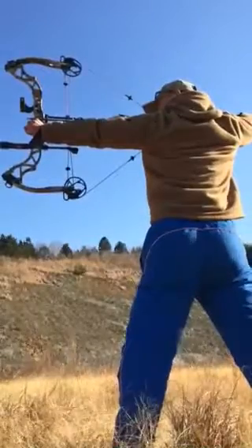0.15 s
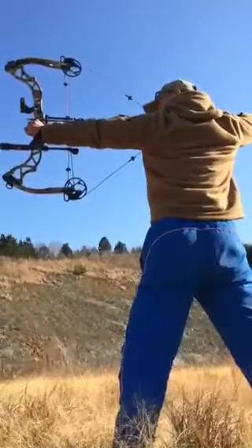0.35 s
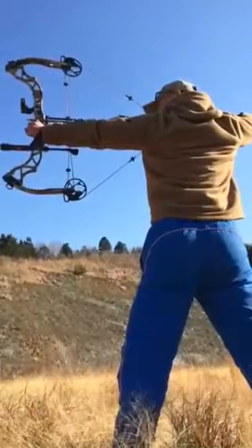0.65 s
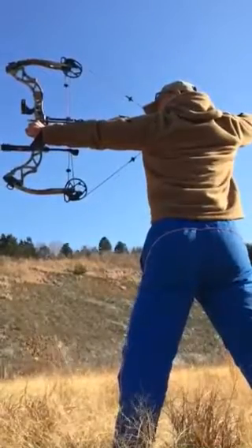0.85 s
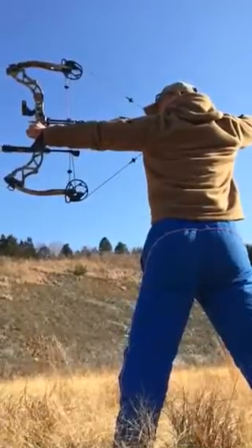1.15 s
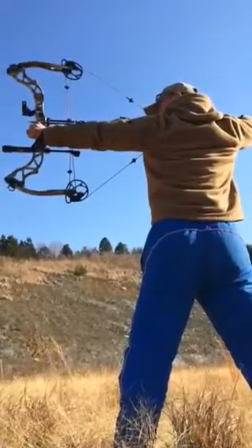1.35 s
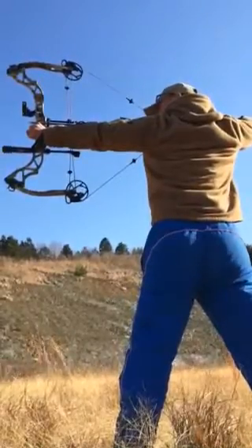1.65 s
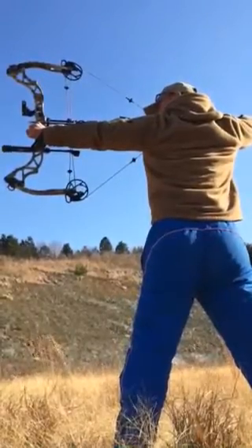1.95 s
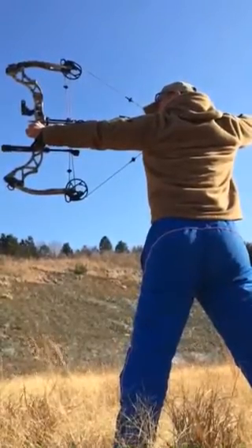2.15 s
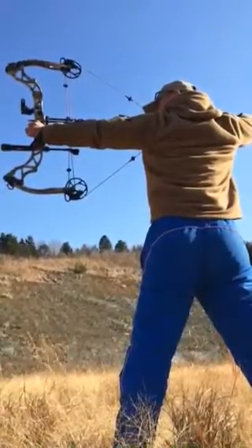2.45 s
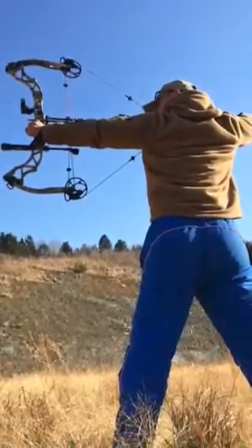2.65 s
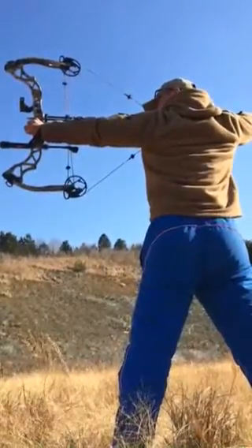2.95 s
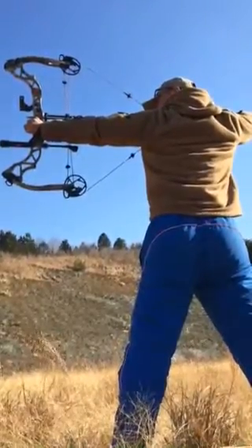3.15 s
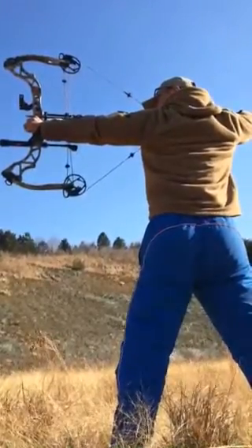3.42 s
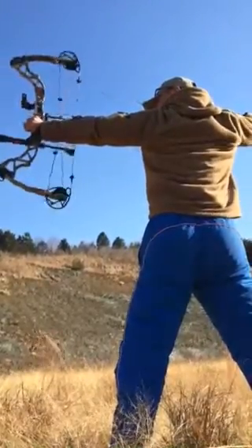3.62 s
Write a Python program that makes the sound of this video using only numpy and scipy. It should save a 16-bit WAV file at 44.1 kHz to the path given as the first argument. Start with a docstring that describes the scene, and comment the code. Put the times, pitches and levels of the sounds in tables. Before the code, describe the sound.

The sharp snap of a compound bow comes after a few quiet seconds of faint wind and rustling grass, with small low gusts on the microphone. The shot is close, with a brief rattle and no echo in the open field.

```python
"""A light breeze hisses in dry grass, and its eddies now and then buffet the microphone.
Near the end a compound bow is shot close by: the string rushes forward, slams home and rebounds.
Each impact excites the damped modes of limbs, riser and string; the string thunks with a sagging
pitch, and the fittings clack and buzz briefly. The open field returns no echo."""
import sys
import numpy as np
from scipy import signal
from scipy.fft import rfft, irfft
from scipy.io import wavfile
from scipy.ndimage import uniform_filter1d

SR = 44100
rng = np.random.default_rng(int(sys.argv[2]) if len(sys.argv) > 2 else 0)


def to_wav(s):
    """Save 16-bit WAV."""
    ch = np.atleast_2d(s).T  # columns
    pcm = np.round(np.clip(ch, -1, 1) * 32767)  # PCM
    wavfile.write(sys.argv[1], SR, pcm.astype(np.int16))


N = 166698

# Course of the field's hiss and of the stalks' rustle: t/s, level/dB
BREEZE_LEVEL = [(0, -51), (.6, -51.5), (1.15, -52), (2.4, -53), (3.4, -53), (3.78, -51)]
STALK_LEVEL = [(0, -60), (.5, -61.5), (1.0, -60), (1.4, -63), (2.0, -63.5), (2.6, -66.5), (3.3, -64.5),
               (3.78, -63.5)]
# Spectra of hiss, rustle, wind rumble and turbulence within an eddy: f/Hz, relative density/dB
HISS_SPECTRUM = [(100, -3.5), (400, -3), (600, -4), (850, 0.5), (1150, 0.5), (1800, -2), (2600, -8.5),
                 (4000, -16), (7000, -21.5), (15000, -24)]
STALK_SPECTRUM = [(300, -4), (1500, -3), (3000, 6), (5000, 0.5), (8000, -1.5), (12000, -3), (15000, -2.5)]
RUMBLE_SPECTRUM = [(20, -41), (40, -3), (65, -0.5), (110, -1), (170, 0), (230, -8.5), (300, -11.5),
                   (500, -24), (1000, -42.5)]
EDDY_SPECTRUM = [(60, -5), (170, 2), (280, -5), (420, -14), (700, -29), (1500, -50)]
# Eddies striking the microphone: t/s, f/Hz, envelope peak/dB, half-width/cycles
EDDIES = [(0.691, 127, -37, 0.53), (1.048, 101, -32, 0.26), (1.109, 113, -33.5, 0.98),
          (1.308, 65.4, -25, 0.17), (1.325, 70, -25.5, 0.16), (1.368, 100, -31.5, 0.31),
          (1.409, 124, -35, .7), (1.443, 228, -23.5, 0.32), (1.463, 80, -37.5, 0.78),
          (1.546, 80.4, -24, 0.17), (1.578, 95, -37, 0.35), (2.002, 84, -37, 0.45),
          (2.435, 100, -35.5, 0.26), (2.772, 85, -31, 0.23), (2.943, 98, -24, 0.33), (2.956, 139, -38, .6),
          (3.156, 74, -35, 0.36), (3.189, 68.5, -27.5, 0.28), (3.288, 70, -34, 0.35),
          (3.319, 87.5, -31, 0.6), (3.555, 90, -30.5, 0.27)]
# The string's impact and rebounds: t/s, tick/dB, crack/dB, ring/dB, crack attack/s, crack T60/s
IMPACTS = [(3.5703, -24, -14, 1, 0.0013, 0.023), (3.5809, -22, -25.5, -23, 0.0008, 0.057),
           (3.592, -11.5, -21.5, -22.5, 0.00058, 0.031), (3.6086, -42, -35, -17, .001, 0.041)]
# Spectra of the hard contacts and of the buzzing fittings: f/Hz, relative density/dB
CONTACT_SPECTRUM = [(120, -24), (300, -13), (600, -1), (780, 3), (1100, -17), (1380, 6), (2200, -2.5),
                    (2600, -9), (2900, 7.5), (3900, -4.5), (5200, -2), (7200, -1), (8400, -18), (9500, 0.5),
                    (11000, -19), (13000, -13), (15000, -4.5)]
BUZZ_SPECTRUM = [(150, -10), (300, 2), (420, 9), (600, -6), (780, 9), (940, 7), (1100, -9), (1400, -2),
                 (2350, -9), (2950, 6), (3900, -2.5), (5200, -9), (7200, -8), (8400, -9), (9600, -8),
                 (11500, -7.5), (15000, -13)]
# Normal modes of limbs, riser and string: f/Hz, level/dB, T60/s
MODES = [(233, -22, 0.048), (380, -25, 0.17), (500, -23, 0.085), (667, -22.5, 0.071), (768, -33, 0.19),
         (831, -22.5, 0.087), (941, -31, 0.12), (1430, -23.5, 0.069), (1517, -28, .09), (1851, -26, 0.089),
         (2352, -33.5, 0.091), (2740, -27.5, 0.05), (2970, -27, 0.062), (3160, -27.5, .08),
         (4415, -29, .08)]

SHOT_S = IMPACTS[0][0]
RING_LAG_S, RING_ATTACK_S = 0.001413, 0.0011


def undb(db):
    """Amplitude ratio of a level in dB."""
    return 10 ** (np.asarray(db) / 20)


def noise(spectrum):
    """White noise filtered to a spectrum (f/Hz, density/dB), at unit rms."""
    hz, db = np.array(spectrum, float).T
    bin_hz = np.maximum(np.arange(N // 2 + 1) * SR / N, 1)
    gain = undb(np.interp(np.log(bin_hz), np.log(hz), db))
    shaped = irfft(rfft(rng.standard_normal(N)) * gain, N)
    return shaped / np.std(shaped)


def flutter(rate_hz):
    """Random values joined by linear ramps, with unit standard deviation."""
    step = max(int(SR / rate_hz), 1)
    held = np.repeat(rng.standard_normal(N)[:N // step + 1], step)
    ramped = uniform_filter1d(held, step)[:N]
    return ramped / np.std(ramped)


def strike(age, attack, t60, hold=0):
    """Linear rise, hold, then exponential decay by 60 dB in t60; times in s."""
    return np.clip(age / attack, 0, 1) * np.exp(-np.log(1000) * np.maximum(age - hold, 0) / t60)


def grass(t, breeze_db):
    """Turbulent flow over the field and friction between dry stalks radiate broadband noise."""
    hiss = undb(breeze_db + .5 * flutter(9)) * noise(HISS_SPECTRUM)
    stalk_db = np.interp(t, *np.array(STALK_LEVEL).T)
    rustle = undb(stalk_db + .4 * flutter(12)) * noise(STALK_SPECTRUM)
    return hiss + rustle


def microphone_wind(t, breeze_db):
    """Turbulent pressure: a rumble follows the breeze, and each eddy pushes and pulls the diaphragm."""
    rumble_db = -50.5 + 0.91 * (breeze_db - breeze_db.mean()) + 2 * flutter(25.03)
    pressure = undb(rumble_db) * noise(RUMBLE_SPECTRUM)
    turbulence = undb(-18) * noise(EDDY_SPECTRUM)
    for when, hz, db, width in EDDIES:
        near = np.abs(t - when) * hz < 10
        cycles = (t[near] - when) * hz
        pulse = np.sin(2 * np.pi * cycles) / np.cosh(cycles / width)
        ragged = turbulence[near] / np.cosh(cycles / (2 * width))
        pressure[near] += undb(db) * (pulse + ragged)
    return pressure


def bow_snap(t):
    """Brief contacts have broad spectra: each impact ticks and cracks, and loose fittings buzz."""
    age = t - SHOT_S
    # String and arrow rush forward just ahead of the first impact.
    rush = undb(-26) * strike(age + 0.0055, attack=.003, t60=0.042)
    ticks = sum(undb(db) * strike(t - start, attack=0.00015, t60=0.0069) for start, db, *_ in IMPACTS)
    cracks = sum(undb(db) * strike(t - start, attack, t60) for start, _, db, _, attack, t60 in IMPACTS)
    buzz = undb(-25 + 0.5 * flutter(700)) * strike(age, RING_ATTACK_S, t60=0.1, hold=0.021)
    return (rush * rng.standard_normal(N)
            + (ticks + cracks) * noise(CONTACT_SPECTRUM)
            + buzz * noise(BUZZ_SPECTRUM))


def bow_ring(t, hum_hz=401):
    """Superposition of damped modes, excited at each impact; the lightly damped string hums on."""
    ring = np.zeros(N)
    for start, _, _, ring_db, *_ in IMPACTS:
        on = t > start + RING_LAG_S
        age = t[on] - start - RING_LAG_S
        for hz, db, t60 in MODES:
            ring[on] += undb(ring_db + db) * strike(age, RING_ATTACK_S, t60) * np.sin(2 * np.pi * hz * age)
    age = t - SHOT_S
    hum = undb(-38.5) * strike(age, RING_ATTACK_S, t60=0.42) * np.sin(2 * np.pi * hum_hz * age)
    return hum - ring


def string_thunk(t, rest_hz=393.4, sag_hz=50.7, sag_s=0.017):
    """Nonlinear free vibration: the arrested string's pitch sags as the shock dies away."""
    age = np.maximum(t - SHOT_S - RING_LAG_S, 0)
    cycles = rest_hz * age + sag_hz * sag_s * (1 - np.exp(-age / sag_s))
    envelope = undb(-15.5) * strike(age, RING_ATTACK_S, t60=0.11, hold=0.0052)
    return -envelope * np.sin(2 * np.pi * cycles)


def scene():
    """In a free field the pressures of wind and bow add without reflections."""
    t = np.arange(N) / SR
    breeze_db = np.interp(t, *np.array(BREEZE_LEVEL).T)
    bow = string_thunk(t) + bow_ring(t) + bow_snap(t)
    return (bow + microphone_wind(t, breeze_db) + grass(t, breeze_db))[None]


def record(dry):
    """Band limiting: filters remove the deepest rumble and the highest treble."""
    highpass = signal.butter(2, 28, "high", fs=SR, output="sos")
    lowpass = signal.ellip(12, .2, 80, 15250, fs=SR, output="sos")
    return signal.sosfilt(lowpass, signal.sosfilt(highpass, dry))


dry = scene()
out = record(dry)
to_wav(out)
```